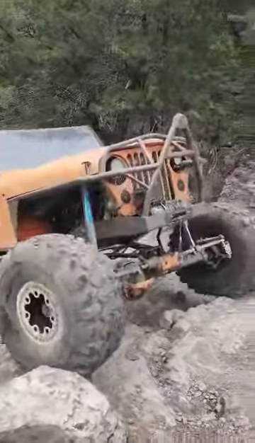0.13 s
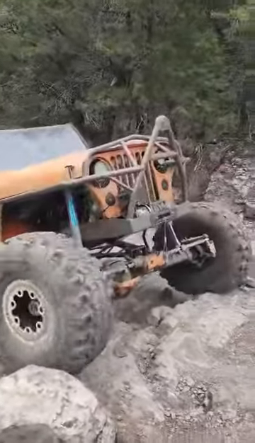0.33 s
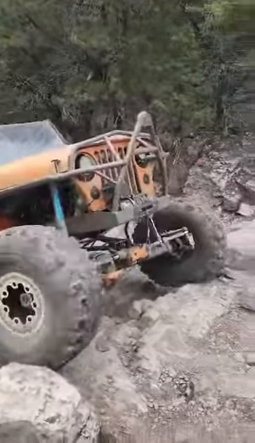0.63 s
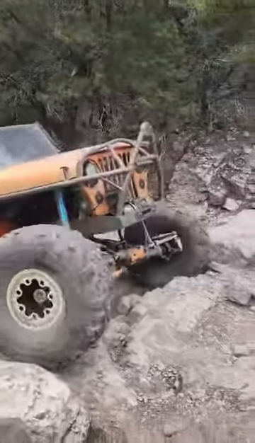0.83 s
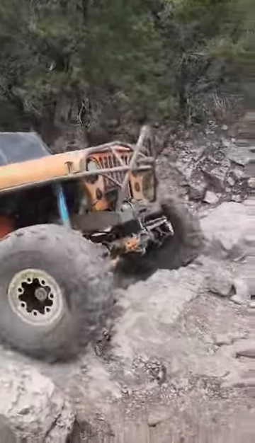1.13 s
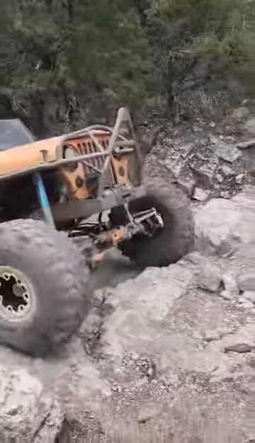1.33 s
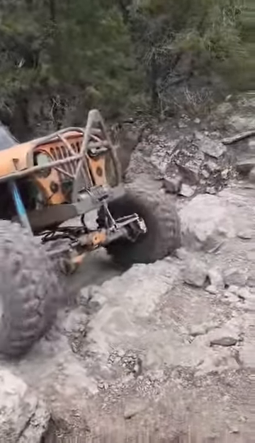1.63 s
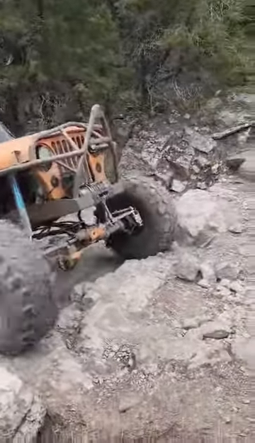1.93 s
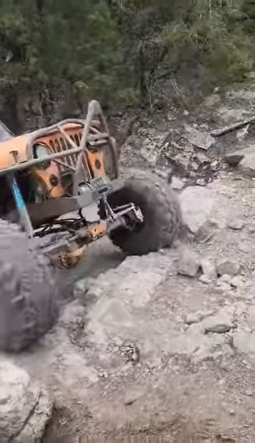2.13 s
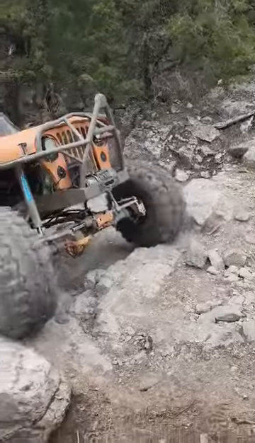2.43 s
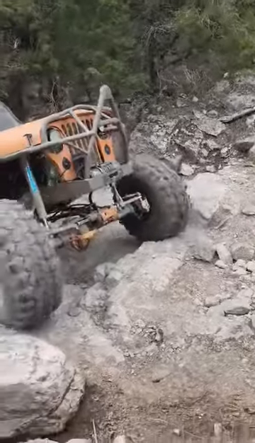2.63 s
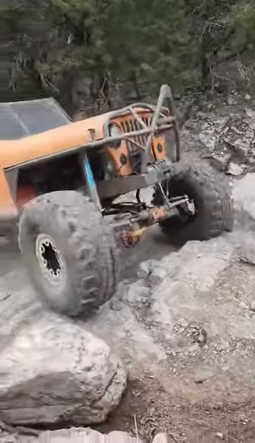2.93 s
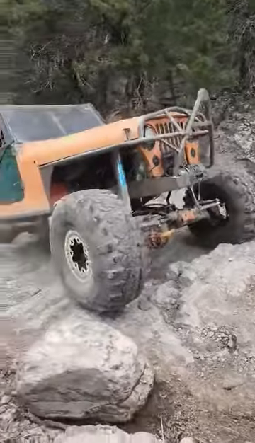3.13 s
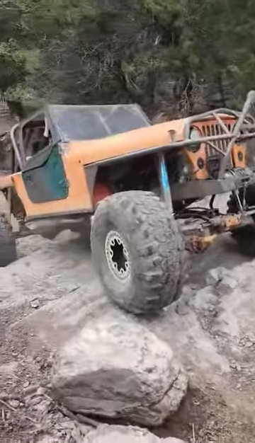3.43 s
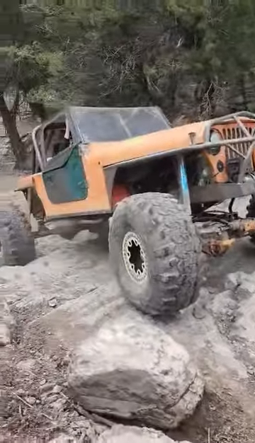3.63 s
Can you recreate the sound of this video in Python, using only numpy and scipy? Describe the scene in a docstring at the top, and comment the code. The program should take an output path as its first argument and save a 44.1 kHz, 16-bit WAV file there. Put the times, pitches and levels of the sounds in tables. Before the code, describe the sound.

Loud throaty engine of a rock-crawling vehicle swells, rocks clack underneath, throttle shuts to a rumble

```python
"""Rock crawler on a stony ledge

A V8 rock crawler works its way up a stony ledge outdoors, built from firing pulses, tones and noise.
The throttle swells three times, holds, then shuts: the exhaust pops and sinks to a low idle.
The cooling fan hisses with the revs; struck resonances make stones knock under the tyres and
steel clink; bursts of grains and noise make rock crack, gravel crunch, steel scrape and rubber judder."""
import sys
import numpy as np
from scipy import signal
from scipy.fft import rfft, irfft, next_fast_len
from scipy.io import wavfile

SR = 44100
rng = np.random.default_rng(int(sys.argv[2]) if len(sys.argv) > 2 else 0)


def transcribe(signal):
    """Save signal, clipped to [-1, 1], as a 16-bit WAV file at the path in sys.argv[1]."""
    frames = np.atleast_2d(signal).T
    limited = np.clip(frames, -1, 1)
    pcm = np.round(limited * 32767).astype(np.int16)
    wavfile.write(sys.argv[1], SR, pcm)


N = 166257
T = np.arange(N) / SR
SIZE = next_fast_len(N + SR // 2, real=True) // 2 * 2   # even FFT length with room for filter tails
HZ = np.maximum(np.arange(SIZE // 2 + 1) * SR / SIZE, 1)

# Levels and spectra are relative: the gains below and each function's own scaling act on them too.
# likeness of the two sides: (frequency [Hz], left-right correlation)
LIKENESS = [(60, 0.91), (150, 0.85), (260, 0.77), (500, 0.81), (1000, 0.82), (2000, 0.61), (4000, 0.051),
            (13000, 0.014)]
# colour of the microphone pair: (frequency [Hz], left minus right [dB])
BALANCE_DB = [(100, -.5), (260, -1), (430, -2), (700, -2.5), (1140, -1.5), (2000, .5), (3000, .5),
              (4000, -5), (5000, -9), (6200, -6), (8000, -1), (10000, 4.5), (12500, -.5)]
CUTOFF_HZ = 13250
# scattered echoes from the rocks
ECHO_DB, ECHO_T60_S = -9, .06

# chassis rumble, its spectrum: (frequency [Hz], level [dB])
RUMBLE_SPECTRUM = [(15, -37), (28, -25), (45, 4), (70, 8), (130, 4), (200, -5), (400, -29), (1200, -31.5),
                   (5000, -42)]
# chassis rumble over time: (time [s], level [dB])
RUMBLE_LEVEL = [(0, -34), (1.5, -37), (3.0, -36), (3.33, -27.5), (3.52, -33.5), (3.77, -32)]

# gravel crunches under the tread: (time [s], length [s], level [dB])
CRUNCHES = [(1.047, 0.1, -40), (2.145, .04, -35), (2.263, 0.07, -35)]
# spectrum of the gravel: (frequency [Hz], level [dB])
GRAVEL_SPECTRUM = [(400, -16), (900, 9.5), (1400, 8.5), (2300, 2.5), (3500, -12), (6000, -21), (13000, -33)]
GRAINS_PER_S = 800
# rubber judders over the rock: (time [s], length [s], level [dB], pitch [Hz])
RUBS = [(0.029, 0.027, -40.5, 780), (0.502, 0.072, -26, 792), (1.356, 0.02, -28, 766)]
RUB_SLIPS_PER_S, RUB_T60_S = 37, 0.034
# steel scrapes on the rock: (time [s], length [s], level [dB])
SCRAPES = [(1.07, 0.038, -50.5), (1.45, 0.032, -54), (1.675, 0.15, -51), (1.936, .025, -57),
           (2.357, 0.015, -50.5), (3.175, 0.03, -58.5)]
# ringing modes of the steel: (frequency [Hz], level [dB], T60 [s])
STEEL_MODES = [(4080, -12, .04), (4410, 0, .09), (4820, -8, .04), (5700, -7, .02), (6730, -1, .07),
               (7370, -10, .04), (10500, -15, .05)]
# spectrum of the grit in the scrapes: (frequency [Hz], level [dB])
GRIT_SPECTRUM = [(2000, -12.5), (3600, -5.5), (4400, 8), (6000, 2.5), (7500, -6.5), (10000, -10.5),
                 (13000, -10)]
GRIT_PER_S, SCRAPE_RING_GAIN, SCRAPE_GRIT_DB = 1500, 1.8, 25.5
# steel clinks: (time [s], level [dB])
CLINKS = [(1.082, -30), (1.469, -35), (1.7, -28), (1.728, -32), (1.775, -29), (1.927, -31), (1.962, -33),
          (2.364, -29.5), (3.192, -39)]
CLINK_SPREAD_DB = 4.8   # chance in each mode of each clink
# rock cracks and crunches: (time [s], level [dB], decay time constant [s])
CRACKS = [(0.502, -24, 0.0092), (1.056, -28, 0.004), (1.4206, -15, 0.002), (1.466, -26, 0.01),
          (1.701, -23, 0.004), (1.773, -27, 0.0062), (1.927, -23, 0.0015), (1.9948, -16, 0.002),
          (2.325, -18.5, 0.004), (2.331, -24, .002), (2.364, -25, 0.003), (3.188, -40.5, .01)]
# spectrum of breaking rock: (frequency [Hz], level [dB])
CRACK_SPECTRUM = [(400, -75), (1000, 8.5), (2200, 12), (3300, -7.5), (4800, 14.5), (7000, 7), (10000, 2),
                  (13000, 0)]
# stones knock under the tyres: (time [s], level [dB], pitch [Hz])
KNOCKS = [(.503, -14, 1270), (.511, -17, 836), (.749, -19.5, 850), (1.056, -26.5, 1520),
          (1.25, -17.5, 1200), (1.4207, -10.5, 1050), (1.428, -18, 1350), (1.434, -20.5, 1370),
          (1.9953, -13.5, 1480), (2.01, -23, 1170), (2.152, -23, 1150), (2.325, -23, 1190),
          (2.3993, -11.5, 1170), (2.423, -26, 1320)]
# ringing modes of a stone: (multiple of its pitch, level [dB], T60 [s])
STONE_MODES = [(.3, -12, .016), (.55, -8, .014), (.76, -3.5, .017), (1, 0, .016), (1.25, -6, .012),
               (1.6, -13, .008), (2.15, -20, .005)]
KNOCK_DB, KNOCK_GRIT, KNOCK_GRIT_DECAY_S = -4, .04, .006

# suspension thumps: (time [s], level [dB])
THUMPS = [(3.662, -17)]
THUMP_HZ, THUMP_T60_S = 118, 0.099
# exhaust pops: (time [s], level [dB])
POPS = [(2.745, -13), (2.776, -12), (2.907, -12), (2.959, -13), (2.996, -10.5), (3.067, -13.5),
        (3.152, -10)]
# ringing modes of the pipe after a pop: (frequency [Hz], level [dB], T60 [s])
POP_MODES = [(156, 4, 0.031), (245, 1.5, 0.049)]
BLOW_SOFT_HZ = 388   # softens pops and thumps alike

# engine speed: (time [s], firing rate [1/s])
FIRING = [(0, 84), (.1, 86), (.42, 109), (.66, 113), (.96, 149), (1.03, 154), (1.1, 151), (1.24, 127),
          (1.32, 120), (1.45, 128), (1.6, 147), (1.67, 149), (1.88, 123), (1.94, 121), (2.09, 137),
          (2.35, 139), (2.44, 145), (2.6, 147), (2.72, 156), (2.87, 151), (2.98, 134), (3.09, 92),
          (3.2, 65), (3.41, 45), (3.53, 58), (3.77, 56)]
# the eight cylinders in firing order: (strength [dB], lateness [firing intervals])
CYLINDERS = [(-3, 0.027), (0.5, 0.144), (7.5, 0.027), (-2, 0.042), (3, 0.215), (-0.5, 0.033), (-3, 0.15),
             (4, 0.064)]
UNEVEN_DB, JITTER_S = 2.8, 0.00014   # chance from firing to firing
# gas rasp and fan hiss over time: (time [s], rasp level [dB], hiss level [dB])
FLOW = [(0, -40.5, -40), (.12, -38.5, -36), (.3, -38.5, -37.5), (.63, -40.5, -37), (.8, -40, -34),
        (1.0, -41.5, -35.5), (1.2, -48, -38), (1.36, -42.5, -37), (1.58, -38, -32.5), (1.75, -42.5, -35),
        (1.92, -42.5, -37.5), (2.1, -40.5, -35), (2.3, -39, -33.5), (2.45, -40.5, -35.5), (2.57, -40, -34),
        (2.73, -41, -33.5), (2.9, -43.5, -37), (3.12, -51, -45), (3.4, -63, -54.5), (3.77, -52, -51.5)]
FLOW_WAVER_DB = .7   # gas and fan flutter together
# spectrum of the fan hiss: (frequency [Hz], level [dB])
HISS_SPECTRUM = [(1500, -0.5), (2800, -29), (3600, -8), (4400, 4), (5200, 7), (6200, 3), (7300, -0.5),
                 (9000, -5), (10500, -4.5), (12000, 0), (13200, -4)]
HISS_DB, HISS_THROB = 2, 0.11
# spectrum of the gas rasp: (frequency [Hz], level [dB])
RASP_SPECTRUM = [(200, -2), (400, 1.5), (520, 9), (700, 13.5), (1000, 1), (1500, -2), (2200, -2.5),
                 (3200, -4.5), (5000, -10.5), (13000, -55)]
RASP_DB, RASP_SHARPNESS, RASP_STEADY = 5.5, 0.7, 7.2
# ring of the silencer shell: (frequency [Hz], level [dB])
BARK_SPECTRUM = [(200, -70), (320, -12.5), (390, 7), (500, -6.5), (600, -6.5), (690, 7.5), (800, -5),
                 (1000, -22), (2000, -33.5), (5000, -40)]
BARK_DB = 4.5
# overtones and burble of the exhaust over time: (time [s], level [dB])
THROB = [(0, -21), (.35, -21), (.7, -22.5), (.77, -16.5), (.87, -19), (1.08, -19.5), (1.25, -21.5),
         (1.6, -19.5), (1.9, -22), (2.2, -21), (2.55, -20.5), (2.9, -22), (3.03, -21.5), (3.12, -26),
         (3.17, -25), (3.22, -29), (3.4, -32), (3.52, -42), (3.77, -42)]
THROB_DB, BURBLE_DB = -1, -6.5   # gains of the overtones and of the burble
# resonances of the exhaust pipe: (frequency [Hz], level [dB])
PIPE_SPECTRUM = [(30, -20), (60, -8), (100, -8), (140, 0.5), (170, -1), (205, -4.5), (235, 0), (257, 2),
                 (285, -0.5), (325, -9.5), (380, -9), (470, -21), (700, -27.5), (1000, -41), (2000, -32),
                 (5000, -81)]
TAILPIPE_HZ, TAILPIPE_WIDTH_HZ, TAILPIPE_DB = 251, 15, 2.5   # its sharpest resonance
# overtones of the exhaust: (multiple of the engine cycle, level [dB])
OVERTONES = [(3, -9.5), (4, -14), (6, -14), (7, -11), (9, -9.5), (10, -9.5), (11, -5), (12, -15),
             (13, -11.5), (14, -7), (15, -7), (16, -7), (17, -12.5), (18, -12), (19, -12.5), (20, -11.5),
             (21, -11), (24, -8)]
OVERTONE_WAVER_DB = 2.2
SPREAD = .19   # staggers the overtones so that they do not pile into one lump per cycle
# clean boom of the tailpipe: (time [s], firing tone level [dB], bank beat level [dB])
BOOM = [(0, -16.5, -35), (.4, -15.3, -33), (.68, -17, -27), (.85, -17, -24.5), (1.05, -16, -22.5),
        (1.27, -21, -25), (1.45, -20, -21.5), (1.65, -14.5, -24), (1.88, -21.5, -24), (2.2, -18.3, -25),
        (2.6, -18.3, -24), (2.9, -17, -24), (3.02, -29, -36), (3.11, -25, -40), (3.2, -27, -45),
        (3.37, -24, -50), (3.5, -31, -52), (3.77, -32, -52)]
BANK_ORDER = 5   # bank beat, as a multiple of the engine cycle
BOOM_WAVER_DB, STEADY_FIRINGS_PER_S = 1, 140   # the slower the engine, the more it stumbles


def amp(db):
    """Decibels to gain."""
    return 10 ** (np.asarray(db) / 20)


def unit(x):
    """Scale to rms 1."""
    return x / np.sqrt(np.mean(x ** 2) + 1e-20)


def in_time(rows):
    """Each column of a curve, at every sample."""
    s, *columns = np.transpose(rows)
    return [np.interp(T, s, c) for c in columns]


def per_hz(points):
    """A table over frequency, at every FFT bin."""
    hz, value = np.transpose(points)
    return np.interp(np.log(HZ), np.log(hz), value)


def filtered(x, gain):
    """Apply a gain per frequency."""
    return irfft(rfft(x, SIZE) * gain, SIZE)[..., :N]


def colour(x, points):
    """Causal (minimum-phase) filter with the given spectrum."""
    cepstrum = irfft(np.log(amp(per_hz(points))))
    # folding the cepstrum onto positive time makes the filter minimum-phase
    cepstrum[1:SIZE // 2] *= 2
    cepstrum[SIZE // 2 + 1:] = 0
    return filtered(x, np.exp(rfft(cepstrum)))


def drift(rate_hz):
    """Random wavering of rms 1, mostly slower than the given rate."""
    return unit(filtered(rng.standard_normal(N), 1 / (1 + (HZ / rate_hz) ** 2)))


def widen(mid, side):
    """Left and right, alike in the bass and nearly unrelated in the treble."""
    alike = np.clip(per_hz(LIKENESS), 0, .999)
    shared = filtered(mid, np.sqrt((1 + alike) / 2))
    opposed = filtered(side, np.sqrt((1 - alike) / 2))
    return shared + opposed * [[1], [-1]]


def noise(spectrum):
    """Coloured stereo noise of rms 1."""
    return unit(colour(widen(*rng.standard_normal((2, N))), spectrum))


def ring(x, hz, t60):
    """A two-pole resonance: a unit click sets a decaying sine of starting height 1 ringing."""
    r, w = amp(-60 / (t60 * SR)), 2 * np.pi * hz / SR
    return signal.lfilter([0, np.sin(w)], [1, -2 * r * np.cos(w), r * r], x + 1e-18)


def clicks(s, size):
    """A click of the given size at each time."""
    return np.bincount(np.clip(np.asarray(s) * SR, 0, N).astype(int), size, N + 1)[:N]


def grains(per_s):
    """Tiny clicks at random moments, different on each side; rms 1."""
    return unit((rng.random((2, N)) < per_s / SR) * rng.standard_normal((2, N)))


def swell(s, length):
    """A rounded rise and fall."""
    return np.sqrt(np.maximum(1 - (2 * (T - s) / length - 1) ** 2, 0))


def swells(rows):
    """The sum of rounded swells, each at its own level."""
    return sum(amp(db) * swell(s, length) for s, length, db in rows)


def dying(s, decay_s):
    """An envelope that starts at s and dies away exponentially."""
    return (T >= s) * np.exp(-np.minimum(np.abs(T - s) / decay_s, 20))


def ledge(x):
    """Short scattered echoes from the rocks, different on each side."""
    tail = rng.standard_normal((2, N)) * amp(-60 * np.minimum(T / ECHO_T60_S, 2))
    return x + amp(ECHO_DB) * filtered(x, rfft(unit(tail) / np.sqrt(N), SIZE))


def chassis_rumble():
    """Low coloured noise from the chassis, under its own level curve."""
    level_db, = in_time(RUMBLE_LEVEL)
    return amp(level_db) * noise(RUMBLE_SPECTRUM)


def crunches():
    """A shower of small grains of gravel under the tread."""
    gravel = unit(colour(widen(*grains(GRAINS_PER_S)), GRAVEL_SPECTRUM))
    return gravel * swells(CRUNCHES)


def rubs():
    """The tread sticks and slips, in short rough chirps of resonant noise."""
    out = 0
    for s, length, db, hz in RUBS:
        slips = 0.38 + np.abs(np.sin(np.pi * RUB_SLIPS_PER_S * (T - s + 0.0022)))
        rubber = unit(ring(rng.standard_normal(N), hz, RUB_T60_S))
        out = out + amp(db) * swell(s, length) * slips * rubber
    return out


def scrapes():
    """Friction breaks off single grains of grit, and each sets the steel ringing."""
    rub = grains(GRIT_PER_S) * swells(SCRAPES)
    # dividing by the root of the ring time keeps long modes from growing too loud
    steel = sum(amp(db) * ring(rub, hz, t60) / np.sqrt(t60 * SR) for hz, db, t60 in STEEL_MODES)
    return SCRAPE_RING_GAIN * steel + amp(SCRAPE_GRIT_DB) * colour(rub, GRIT_SPECTRUM)


def clinks():
    """The same steel, tapped by loose stones that excite its modes unevenly."""
    s, db = np.transpose(CLINKS)
    out = 0
    for hz, level, t60 in STEEL_MODES:
        chance_db = rng.normal(0, CLINK_SPREAD_DB, len(s))
        out = out + ring(clicks(s, amp(db + level + chance_db)), hz, t60)
    return out


def cracks():
    """Bright, grainy bursts of breaking rock: roughened noise that dies away fast."""
    grain = unit(amp(3 * drift(750)))
    bursts = sum(amp(db) * dying(s, decay) for s, db, decay in CRACKS)
    return noise(CRACK_SPECTRUM) * grain * bursts


def knocks():
    """Each stone is struck once, grinds briefly as it settles, and rings in its modes."""
    out, t = np.zeros(N + SR), T[:SR // 8]
    for s, db, hz in KNOCKS:
        grind = KNOCK_GRIT * rng.standard_normal(len(t)) * np.exp(-t / KNOCK_GRIT_DECAY_S)
        force = (t == 0) + grind
        stone = sum(amp(level) * ring(force, hz * ratio, t60) for ratio, level, t60 in STONE_MODES)
        i = int(s * SR)
        out[i:i + len(t)] += amp(db + KNOCK_DB) * stone
    return out[:N]


def thuds(rows, hz, t60):
    """Soft blows that ring for a few low cycles."""
    s, db = np.transpose(rows)
    soften = 1 / (1 + 1j * HZ / BLOW_SOFT_HZ - (HZ / BLOW_SOFT_HZ) ** 2)   # second-order low-pass
    return filtered(ring(clicks(s, amp(db)), hz, t60), soften)


def pops():
    """Unburnt fuel fires in the pipe and sets its modes ringing in opposite polarity."""
    out = 0
    for k, (hz, db, t60) in enumerate(POP_MODES):
        out = out + (-1) ** (k + 1) * amp(db) * thuds(POPS, hz, t60)
    return out


def firings(turns):
    """One pulse per firing, set by its cylinder; and how much stronger or weaker each burn is."""
    k = np.arange(int(turns[-1]))
    db, late = np.transpose(CYLINDERS)[:, k % len(CYLINDERS)]
    time_chance, burn_chance = rng.standard_normal((2, len(k)))
    s = np.interp(k + late, turns, T) + JITTER_S * time_chance
    pulses = clicks(s, amp(db + UNEVEN_DB * burn_chance))
    misburns = clicks(s, np.tanh(burn_chance))
    return pulses, misburns


def fan_and_gas(pulses, bark):
    """Fan hiss and gas rasp are noise swelling with each exhaust puff; the silencer bark joins the rasp."""
    rasp_db, hiss_db = np.array(in_time(FLOW)) + FLOW_WAVER_DB * drift(10)
    # smoothing the pulses at 130 Hz turns them into puffs
    puffs = unit(np.abs(filtered(pulses, 1 / (1 + 1j * HZ / 130) ** 2)) + 1e-9)
    fan = noise(HISS_SPECTRUM) * unit(1 + HISS_THROB * puffs)
    gas = noise(RASP_SPECTRUM) * unit(puffs ** RASP_SHARPNESS + RASP_STEADY)
    rasp = amp(BARK_DB) * bark + amp(RASP_DB) * gas
    return amp(hiss_db + HISS_DB) * fan + amp(rasp_db) * rasp


def overtones(turns, rate):
    """Multiples of the eight-cylinder cycle swell as they glide through the pipe's resonances."""
    out = 0
    tailpipe_db = TAILPIPE_DB / (1 + ((HZ - TAILPIPE_HZ) / TAILPIPE_WIDTH_HZ) ** 2)
    pipe_db = per_hz(PIPE_SPECTRUM) + tailpipe_db
    for order, db in OVERTONES:
        ratio = order / len(CYLINDERS)
        level = db + np.interp(ratio * rate, HZ, pipe_db) + OVERTONE_WAVER_DB * drift(6)
        out = out + amp(level) * np.cos(2 * np.pi * (ratio * turns + SPREAD * order * order))
    return np.sqrt(2) * out


def boom(turns, rate):
    """The firing tone, and the lower beat of the two unevenly firing banks."""
    tone_db, bank_db = in_time(BOOM)
    waver_db = BOOM_WAVER_DB * STEADY_FIRINGS_PER_S / rate
    tone = amp(tone_db + waver_db * drift(9)) * np.cos(2 * np.pi * turns)
    bank_turns = turns * BANK_ORDER / len(CYLINDERS)
    bank = amp(bank_db + waver_db * drift(9)) * np.cos(2 * np.pi * bank_turns)
    return np.sqrt(2) * (tone + bank)


def engine():
    """Firing pulses ring in the exhaust and puff out gas, over the boom, overtones and fan."""
    rate, = in_time(FIRING)
    turns = np.cumsum(rate) / SR   # firings so far
    throb_db, = in_time(THROB)
    pulses, misburns = firings(turns)
    scatter = rng.standard_normal(N)   # the side signal of both burble and bark
    burble = unit(colour(widen(unit(misburns / np.sqrt(rate)), scatter), PIPE_SPECTRUM))
    bark = unit(colour(widen(unit(pulses / np.sqrt(rate)), scatter), BARK_SPECTRUM))
    tones = boom(turns, rate) + amp(throb_db + THROB_DB) * overtones(turns, rate)
    return tones + amp(throb_db + BURBLE_DB) * burble + fan_and_gas(pulses, bark)


def scene():
    """Stones and steel under the tyres with their echoes, and the vehicle over them."""
    ground = ledge(crunches() + rubs() + scrapes() + clinks() + cracks() + knocks())
    thumps = thuds(THUMPS, THUMP_HZ, THUMP_T60_S)
    return chassis_rumble() + ground + thumps + pops() + engine()


def record(dry):
    """The two microphones differ in colour; the top is cut."""
    tilt = amp(per_hz(BALANCE_DB) * [[.5], [-.5]])
    even_tilt = tilt / np.sqrt(np.mean(tilt ** 2, axis=0))   # keeps the mean power of the two sides
    top_cut = 1 / np.sqrt(1 + (HZ / CUTOFF_HZ) ** 240)
    return filtered(dry, even_tilt * top_cut)


dry = scene()
out = record(dry)
transcribe(out)
```